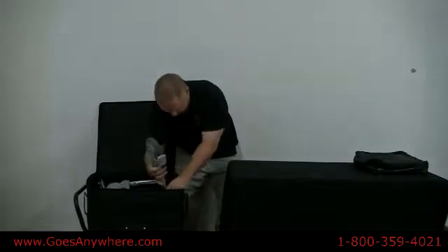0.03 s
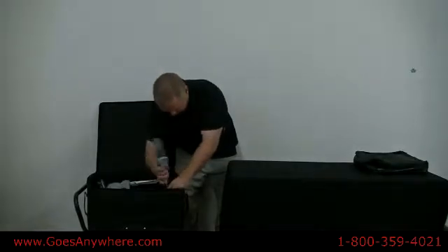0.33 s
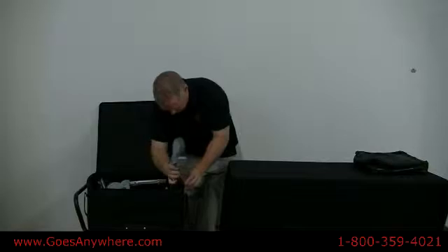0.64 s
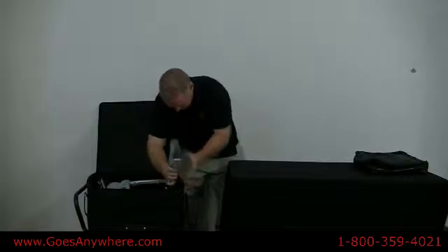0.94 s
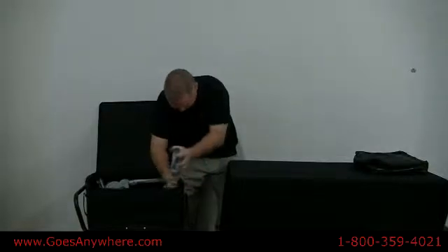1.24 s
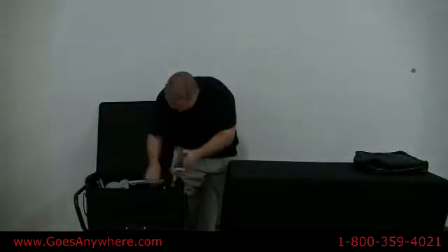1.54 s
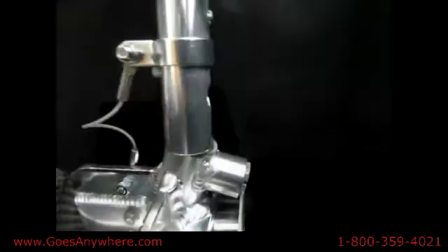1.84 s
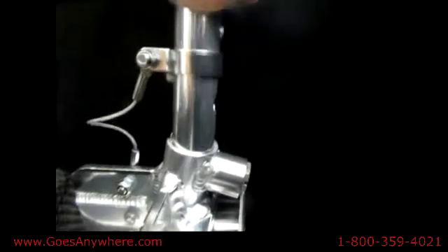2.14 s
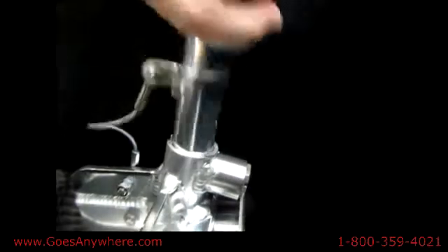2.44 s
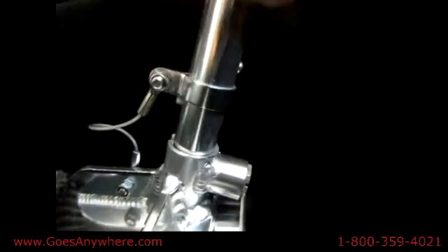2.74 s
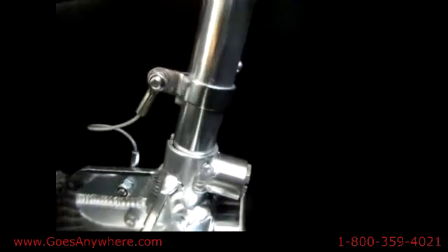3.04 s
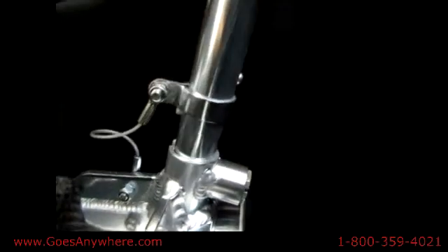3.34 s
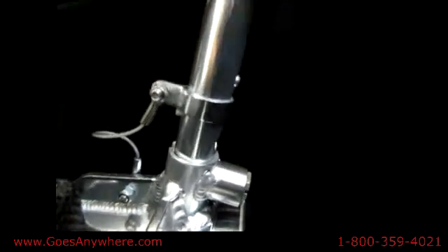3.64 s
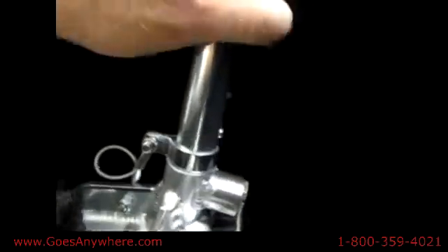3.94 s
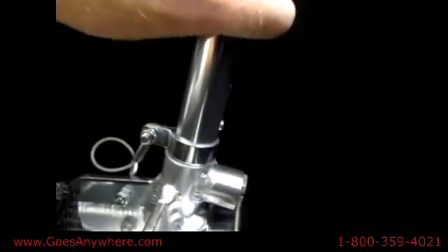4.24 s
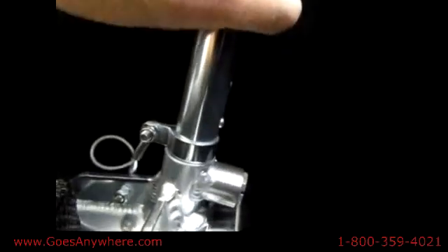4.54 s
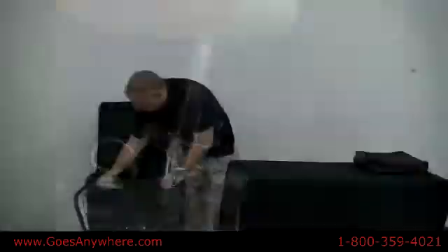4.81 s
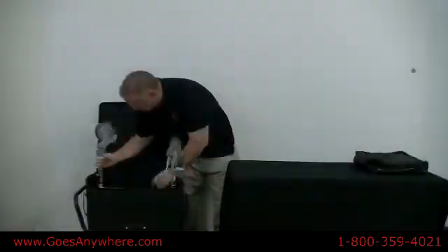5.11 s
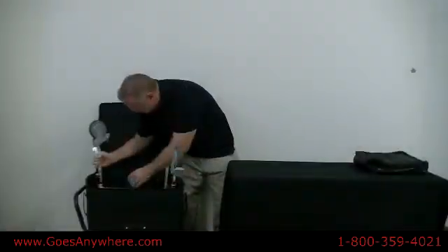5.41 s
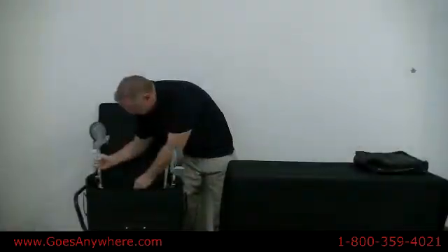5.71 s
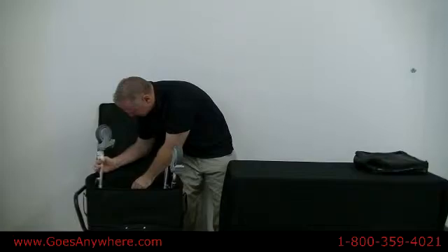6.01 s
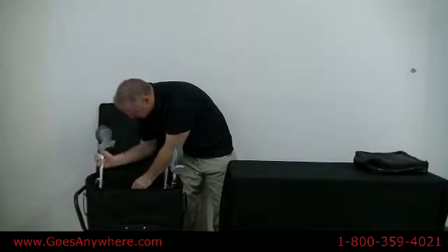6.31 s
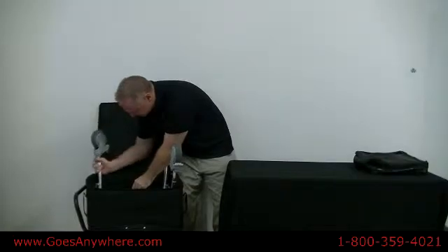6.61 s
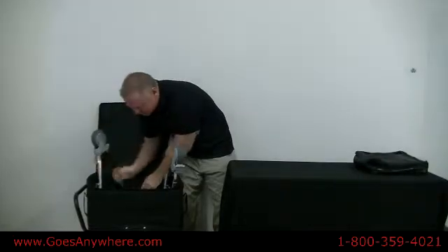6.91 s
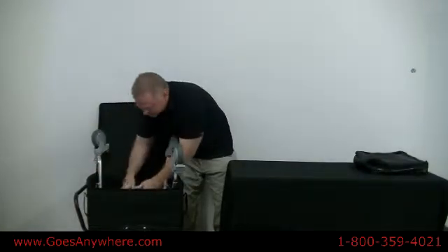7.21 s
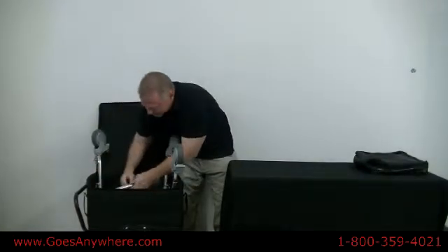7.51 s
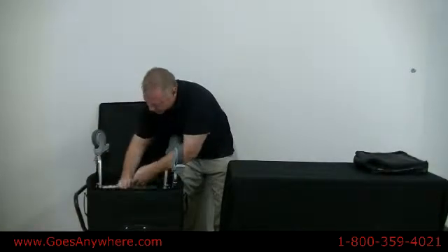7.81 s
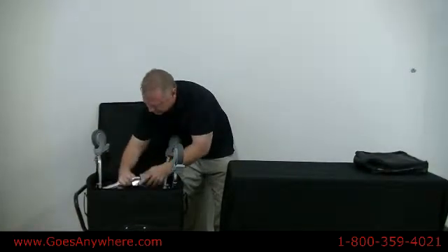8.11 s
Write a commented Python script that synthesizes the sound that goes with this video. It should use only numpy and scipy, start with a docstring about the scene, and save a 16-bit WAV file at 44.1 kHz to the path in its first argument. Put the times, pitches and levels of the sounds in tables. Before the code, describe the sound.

A tubular metal chair frame clanks against a hard case in a humming room; close up, a clamp clicks and a tube slides home.

```python
"""Metal chair frame in its hard case

Across a bare room with a mains hum, the tubular frame clanks against the case, small fittings
tick and the walls ring on. For about three seconds the sound is close and dry: a clamp clicks,
a tube slides in its socket and seats. Blows are impulse, chatter and decaying modes; the slide is noise."""
import sys
import numpy as np
from scipy import signal
from scipy.fft import rfft, irfft, next_fast_len
from scipy.io import wavfile
from scipy.ndimage import map_coordinates

SR = 44100
rng = np.random.default_rng(int(sys.argv[2]) if len(sys.argv) > 2 else 0)


def dump(signal):
    """Clip the signal to [-1, 1] and save it as 16-bit WAV at the path in sys.argv[1]."""
    limited = np.clip(np.atleast_2d(signal).T, -1, 1)
    pcm = np.round(limited * 32767).astype(np.int16)
    wavfile.write(sys.argv[1], SR, pcm)


N = 359415

# room air far and close, narrow treble hiss: (frequency [Hz], relative density [dB])
AIR_FAR_SPECTRUM = [(18, -27), (32, -6.5), (45, -14.5), (85, -3), (120, -3.5), (150, -6.5), (230, -8),
                    (330, -12), (1000, -15), (2500, -21.5), (6000, -27.5), (9000, -25), (12500, -35.5),
                    (15500, -48.5)]
AIR_NEAR_SPECTRUM = [(20, -14), (65, -1), (107, -8.5), (172, -7.5), (270, -17), (950, -21), (1200, -23),
                     (6200, -33), (11000, -42.5), (15500, -62)]
HISS_SPECTRUM = [(6500, -22.5), (8200, -10.5), (8900, -0.5), (9700, -5.5), (12000, -20.5), (14000, -52)]
# mains hum: (frequency [Hz], level [dB])
HUM_PARTIALS = [(59.2, -62.5), (118.4, -57.5), (236.8, -75)]
# far/close background crossfade: (time [s], far share [0-1])
FAR_FADE = [(1.68, 0.88), (1.82, 0.94), (1.96, 0.05), (4.6, 0.06), (4.8, 1), (5.0, 0.87)]

# blows, frame on case (far) and clamp on tube (close):
# (time [s], level [dB], thud [dB re level], treble [dB re level], favoured ring [Hz], ring [dB re blow])
FRAME_BLOWS = [(.002, -33.5, -18, -18.5, 1817, 3), (.153, -39.5, -12, -14, 1010, -3.5),
               (.236, -35, -11.5, -16.5, 1584, -2), (.338, -36.5, -12, -12, 1706, -2.5),
               (1.217, -37, -17, -8.5, 904, -30.5), (1.2443, -21, -15.5, -6, 1620, -13),
               (1.308, -25.5, -13, -5.5, 832, -9), (1.334, -29.5, -21.5, -5, 1720, -14.5),
               (1.428, -45.5, -22, -2, 3285, 2), (4.884, -49, -13, -12, 632, 0.5),
               (4.905, -32, -20.5, -14, 627, 2.5), (4.914, -34, -26, -29.5, 1316, -1),
               (4.934, -38, -20.5, -43, 637, 6.5), (5.629, -31.5, -9.5, -11.5, 377, -4.5),
               (5.655, -35, -12, -36, 637, 1.5), (5.835, -49, -15, -24, 708, 5),
               (5.88, -47.5, -9, 1.5, 5730, -18), (5.889, -41.5, -11, 0.5, 5650, -15),
               (5.902, -39.5, -26, -10, 2740, -6), (6.33, -54, -8, -18, 835, 4),
               (6.39, -56, -5, -7, 1090, -7), (6.53, -42, -12, -4, 1060, -24),
               (6.5996, -22.5, -7, -5, 1060, -11), (6.624, -26.5, -15, -3, 176.5, -12.5),
               (7.276, -40, -18.5, -24.5, 1540, -8)]
CLAMP_BLOWS = [(1.8367, -27, -20, -13, 1610, 1), (2.1897, -28, -18.5, -8.5, 1900, -13),
               (2.205, -37.5, -11, 1.5, 624, -7), (2.5267, -31, -26, -5.5, 1650, -7),
               (2.915, -51.5, -2, -4, 1620, -4), (3.19, -49.5, 2.5, -1, 1620, -26),
               (3.2426, -43.5, 0, -14, 530, -7), (3.788, -46.5, -3.5, -5.5, 1860, -3),
               (3.823, -41.5, -7, -15, 1620, -10), (3.835, -31, -1.5, -16, 955, -4),
               (3.84, -47.5, -8, 16, 955, -8.5), (3.897, -48, 4, -9, 430, -3.5),
               (3.943, -23, -11.5, -9, 730, -9.5), (3.951, -26, -9, -2, 201, -16),
               (4.303, -69, -4, -17, 955, 8), (4.445, -59, -6, -9.5, 955, -6),
               (4.657, -54.5, -8, -4, 990, -5), (4.667, -43, -10, -12.5, 984, -3),
               (4.827, -49.5, -14.5, -13, 1020, -7), (4.853, -38.5, -12, -16.5, 1100, -14)]
# taps of small fittings, far: (time [s], level [dB], treble [dB re level])
FITTING_TAPS = [(.587, -57.5, -1), (1.151, -50.5, -1.5), (5.18, -61, 8), (5.318, -67.5, 12),
                (7.341, -58, 3.5), (7.42, -42, -8.5), (7.438, -49, 2), (7.785, -53, 4), (7.834, -45.5, -4),
                (7.915, -43, -3), (7.984, -59, 6), (8.139, -65.5, 10)]
# the catch springs in: (time [s], frequency [Hz], peak [dB], t60 [s])
CATCH_PINGS = [(2.1912, 8540, -22.5, 0.019), (3.838, 12280, -36.5, 0.12)]
# resonances: (frequency [Hz], relative energy [dB], t60 [s])
FRAME_MODES = [(154, -7, 0.21), (195, -1, 0.36), (392, 1.5, 0.1), (437, 2, 0.05), (623.8, 5, 0.32),
               (760, 2.5, 0.11), (832, -2, 0.22), (927, -2, 0.23), (1028, 0.5, 0.16), (1358, -2.5, 0.1),
               (1538, 5, 0.069), (1650, 2, 0.27), (1888, 4, 0.16), (2020, -7.5, 0.17), (2200, -4.5, 0.18),
               (2660, -2.5, 0.52), (2764, 3, 0.099), (3285, -6.5, .12), (3780, -17.5, .12)]
FITTING_MODES = [(830, 1, 0.0065), (1900, 3.5, 0.021), (1980, -16, 0.059), (5500, 2.5, 0.012),
                 (5900, -3, 0.007), (6480, -5, 0.011)]
TUBE_MODES = [(201.5, -2, 0.38), (406, -4.5, 0.25), (651, -8.5, 0.21), (955, 1.5, 0.091),
              (1060, -11, 0.099), (1504, 3.5, 0.044), (1620, -3.5, 0.1), (1823, -1, 0.052),
              (2460, 1, 0.0034), (2820, -2, 0.069), (6090, -7.5, 0.032), (7360, -7, 0.024),
              (8740, -9.5, 0.023), (9400, -9, 0.037), (11730, -3.5, 0.039)]
# contact colour: (frequency [Hz], relative density [dB])
CLANK_SPECTRUM = [(60, -33.5), (110, -20), (160, 6.5), (270, -3.5), (400, 1.5), (510, -3), (700, 3.5),
                  (1700, 1.5), (3300, -1), (6000, -7.5), (7500, -12), (10000, -13), (13000, -23.5),
                  (16000, -37.5)]
TICK_SPECTRUM = [(80, -12), (200, 19.5), (900, 1), (3000, 4), (6300, 7), (7500, -11.5), (10000, -14),
                 (15000, -22)]
CLICK_SPECTRUM = [(40, -6.5), (150, 8), (500, 0), (1500, 3.5), (3000, 2), (5000, 1.5), (8500, 1),
                  (11500, -6), (13500, -18.5), (15500, -33)]
# wall reverberation: (frequency [Hz], t60 [s])
ROOM_DECAY = [(120, 0.3), (320, 0.44), (840, 0.39), (2200, 0.49), (5800, 0.55), (10000, 0.43),
              (15000, 0.41)]

# hand pushing the tube home: (time [s], effort [dB])
PUSH_EFFORT = [(2.4, -76.5), (2.892, -65.5), (3.374, -56.5), (3.71, -56.5), (3.872, -52.5), (3.924, -64.5),
               (4.1, -80)]
# short slips of the tube: (peak time [s], level [dB], rumble [dB re level])
TUBE_SLIPS = [(2.171, -52, 2), (2.515, -55, -16), (2.56, -60, 9), (2.81, -63, -10), (2.95, -54, 6),
              (3.31, -47.5, -13), (3.805, -38, -2), (3.845, -33.5, -1), (3.968, -30, -15)]
# socket friction, handling rumble: (frequency [Hz], relative density [dB])
SCRAPE_SPECTRUM = [(130, -16.5), (220, 3.5), (290, -5.5), (420, 1.5), (720, -3), (960, -3), (1150, -8),
                   (1600, -7.5), (4500, -14), (11000, -17), (15500, -33.5)]
RUMBLE_SPECTRUM = [(12, -20), (26, -6), (50, 2.5), (100, -1.5), (170, -1.5), (290, -20), (500, -40.5)]

# stereo width: (frequency [Hz], side gain [dB])
FAR_WIDTH = [(60, -25.5), (500, -25), (1000, -20), (2000, -18.5), (4000, -12), (8000, -5), (12000, -3.5)]
NEAR_WIDTH = [(60, -19.5), (500, -16.5), (2000, -4), (4000, -3.5), (8000, -1.5), (12000, 0.5)]
AIR_WIDTH = [(60, -16.5), (110, -14), (380, -6), (700, -8), (2400, -7), (4400, -5.5), (8100, -1.5),
             (15000, 1.5)]


def amp(db):
    """Decibels to gain."""
    return 10 ** (np.asarray(db) / 20)


def unit(x):
    """Scale to rms 1."""
    return x / np.sqrt(np.mean(x ** 2) + 1e-20)


def along(points, hz):
    """Interpolate (frequency [Hz], value) points on a log axis."""
    knots_hz, values = np.transpose(points)
    return np.interp(np.log(hz + 1), np.log(knots_hz + 1), values)


def curve(points):
    """Interpolate (time [s], value) points per sample."""
    return np.interp(np.arange(N) / SR, *np.transpose(points))


def wobble(rate_hz):
    """Smooth random curve through rate_hz knots a second."""
    knots = rng.standard_normal(int(N * rate_hz / SR) + 4)
    return map_coordinates(knots, [np.arange(N) * rate_hz / SR])


def colour(x, points):
    """Minimum-phase filter through (frequency [Hz], gain [dB]) points."""
    half = next_fast_len(x.shape[-1] // 2 + 2048)
    gain = amp(along(points, np.fft.rfftfreq(2 * half, 1 / SR)))
    cepstrum = irfft(np.log(gain))
    cepstrum[1:half] *= 2
    cepstrum[half + 1:] = 0
    return irfft(rfft(x, 2 * half) * np.exp(rfft(cepstrum)))[..., :x.shape[-1]]


def noise(spectrum):
    """Mid and side noise, rms 1."""
    return unit(colour(rng.standard_normal((2, N)), spectrum))


def stereo(mid_side, width):
    """Mid/side to left/right; widest in the treble."""
    mid, side = mid_side[0], colour(mid_side[1], width)
    return np.array([mid + side, mid - side])


def add(track, at_s, sound):
    """Mix a sound in at at_s."""
    part = track[:, max(round(at_s * SR), 0):][:, :sound.shape[1]]
    part += sound[:, :part.shape[1]]


def background(far_db=-53.5, near_db=-62, hiss_db=-65.5):
    """Room air, hiss and a wavering mains hum; quieter close to the case."""
    t = np.arange(N) / SR
    far = amp(far_db) * noise(AIR_FAR_SPECTRUM) + amp(hiss_db) * noise([(3000, -70.5)] + HISS_SPECTRUM)
    drift_s = 0.00048 * wobble(6.5)
    hum = sum(amp(db) * np.sqrt(2) * np.sin(2 * np.pi * hz * (t + drift_s)) for hz, db in HUM_PARTIALS)
    far[0] += amp(1.2 * wobble(12)) * hum
    share = curve(FAR_FADE)
    return share * far + (1 - share) * amp(near_db) * noise(AIR_NEAR_SPECTRUM)


def contact(modes, spectrum, chatter_db, chatter_t60_s, modes_db):
    """One blow: impulse, brief chatter of loose joints, modes rung at random strengths."""
    t = np.arange(SR // 4) / SR
    impulse = unit(1. * (t == 0))
    chatter = unit(amp(-60 * t / chatter_t60_s) * rng.standard_normal((2, len(t))))
    crack = colour(impulse + amp(chatter_db) * chatter, spectrum)
    hz, db, t60_s = np.transpose(modes)[:, :, None]
    waves = amp(db - 60 * t / t60_s) / np.sqrt(t60_s) * np.sin(2 * np.pi * hz * t)
    strength = amp(2 * rng.standard_normal((2, len(modes)))) * rng.choice([-1, 1], (2, len(modes)))
    return unit(crack) + amp(modes_db) * unit(strength @ waves)


def favoured_ring(hz, t60_s):
    """The resonance that the point of contact drives hardest."""
    t = np.arange(SR // 4) / SR
    phase = 2 * np.pi * hz * t
    # side in quadrature: the ring reaches left and right at slightly different times
    return amp(-60 * t / t60_s) * np.array([np.sin(phase), np.cos(phase)])


def in_room(x, wet_db, build_s):
    """Direct sound plus a diffuse tail that builds, then decays at each frequency's own rate."""
    hz, t, bins = signal.stft(rng.standard_normal((2, SR * 2 // 3)), SR, nperseg=256)
    decay = amp(-60 * t / along(ROOM_DECAY, hz)[:, None])
    _, response = signal.istft(bins * decay, SR, nperseg=256)
    size = response.shape[1]
    response *= 1 - np.exp(-np.arange(size) / SR / build_s)
    response *= amp(wet_db) / np.linalg.norm(response[0])
    response[:, 0] += 1  # direct path
    return signal.fftconvolve(x, response, axes=1)[:, :size]


def balance(x, thud_db, treble_db, onset_s):
    """Bring a blow's onset to 0 dB in the mids; weight sets the bass, hardness the treble."""
    size = int(onset_s * SR)
    power = np.abs(rfft(x[0, :size], SR)) ** 2 * 2 / (SR * size)
    bands_hz = [(140, 450), (500, 3000), (4000, 12000)]
    low_db, mid_db, high_db = [10 * np.log10(power[lo:hi].sum()) for lo, hi in bands_hz]
    bass_db = thud_db - low_db
    return colour(x, [(70, bass_db - 9), (140, bass_db), (420, bass_db),
                      (580, -mid_db), (2100, -mid_db), (4500, treble_db - high_db)])


def frame_clanks(rebound_s=0.009, rebound_db=-7, t60_cycles=61):
    """The loose frame hits the case and rebounds once; most sound arrives via the walls."""
    track = np.zeros((2, N))
    for at_s, db, thud_db, treble_db, ring_hz, ring_db in FRAME_BLOWS:
        for delay_s, loss_db in [(0, 0), (rebound_s, rebound_db)]:
            blow = contact(FRAME_MODES, CLANK_SPECTRUM, chatter_db=-4, chatter_t60_s=0.024, modes_db=-5.5)
            blow = unit(in_room(blow, wet_db=13, build_s=0.00043))
            ring = favoured_ring(ring_hz, t60_cycles / ring_hz)
            ring = unit(in_room(ring, wet_db=3.5, build_s=0.0012))
            clank = balance(blow + amp(ring_db) * ring, thud_db, treble_db, onset_s=0.041)
            add(track, at_s + delay_s, amp(db + loss_db) * clank)
    return track


def fitting_ticks(thud_db=-10, ring_db=-11):
    """Small fittings, all about equally light, tap the tubes with a thin, high ring."""
    track = np.zeros((2, N))
    for at_s, db, treble_db in FITTING_TAPS:
        tap = contact(FITTING_MODES, TICK_SPECTRUM, chatter_db=-1, chatter_t60_s=0.026, modes_db=-2.5)
        tap = unit(in_room(tap, wet_db=10, build_s=0.003))
        ring = unit(in_room(favoured_ring(hz=6100, t60_s=0.0022), wet_db=7, build_s=0.003))
        tick = balance(tap + amp(ring_db) * ring, thud_db, treble_db, onset_s=0.026)
        add(track, at_s, amp(db) * tick)
    return track


def clamp_clicks(t60_cycles=35):
    """Clamp and tube snap close by, nearly dry; the catch pings as it springs in."""
    track = np.zeros((2, N))
    for at_s, db, thud_db, treble_db, ring_hz, ring_db in CLAMP_BLOWS:
        snap = contact(TUBE_MODES, CLICK_SPECTRUM, chatter_db=9.5, chatter_t60_s=0.031, modes_db=-3.5)
        ring = unit(favoured_ring(ring_hz, t60_cycles / ring_hz))
        click = in_room(unit(snap) + amp(ring_db) * ring, wet_db=-21.5, build_s=0.0021)
        add(track, at_s, amp(db) * balance(click, thud_db, treble_db, onset_s=0.011))
    for at_s, hz, db, t60_s in CATCH_PINGS:
        add(track, at_s, amp(db) * favoured_ring(hz, t60_s))
    return track


def tube_slide(scrape_db=3.5, rumble_db=7, fade_s=0.027):
    """The tube rubs and slips through its socket under a growing push; the hand shakes the frame."""
    t = np.arange(N) / SR
    grab_s, release_s = PUSH_EFFORT[0][0], PUSH_EFFORT[-1][0]
    held = np.clip(np.minimum(t - grab_s, release_s - t) / fade_s, 0, 1)
    push = amp(curve(PUSH_EFFORT)) * held
    scrape_gain, rumble_gain = amp(scrape_db) * push, amp(rumble_db) * push
    rise_s, fall_s = 0.061, 0.048  # per 20 dB
    for peak_s, db, slip_rumble_db in TUBE_SLIPS:
        slip = amp(db - 20 * np.maximum((peak_s - t) / rise_s, (t - peak_s) / fall_s))
        scrape_gain = np.hypot(scrape_gain, slip)
        rumble_gain = np.hypot(rumble_gain, amp(slip_rumble_db) * slip)
    grip = unit(amp(2.2 * wobble(35) + 0.95 * wobble(340)))  # surfaces catch and let go
    return scrape_gain * grip * noise(SCRAPE_SPECTRUM) + rumble_gain * noise(RUMBLE_SPECTRUM)


def scene():
    """Far handling, close handling, room background."""
    far = stereo(frame_clanks() + fitting_ticks(), FAR_WIDTH)
    near = stereo(clamp_clicks() + tube_slide(), NEAR_WIDTH)
    return far + near + stereo(background(), AIR_WIDTH)


def record(dry):
    """Brick-wall low-pass."""
    cutoff_hz = 15800
    size = next_fast_len(N + SR // 2)
    passband = np.fft.rfftfreq(size, 1 / SR) < cutoff_hz
    return irfft(rfft(dry, size) * passband, size)[:, :N]


dry = scene()
out = record(dry)
dump(out)
```